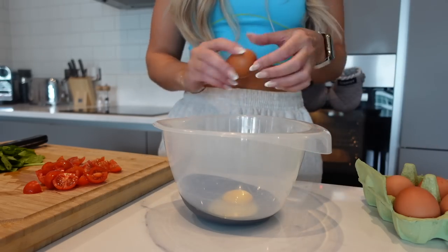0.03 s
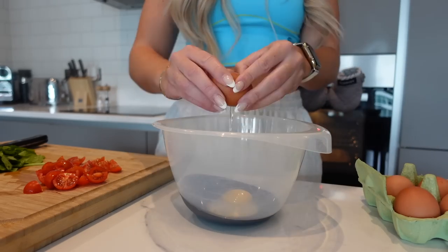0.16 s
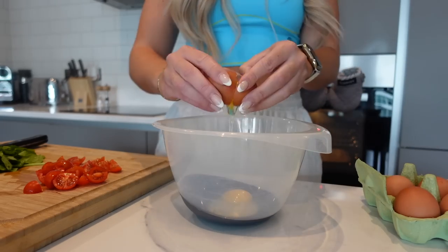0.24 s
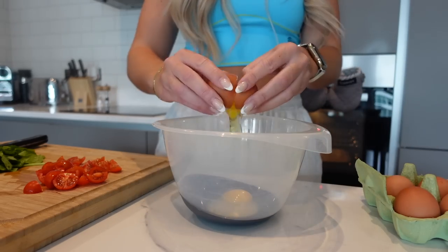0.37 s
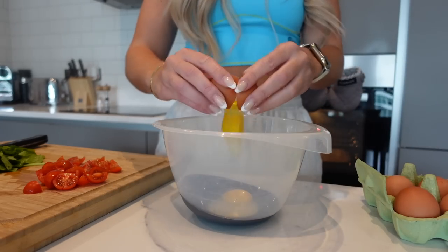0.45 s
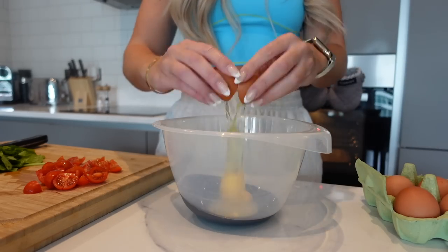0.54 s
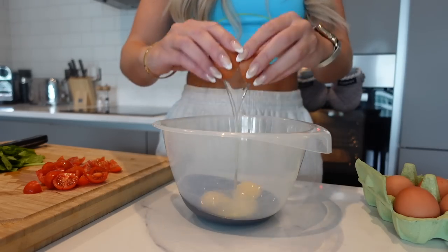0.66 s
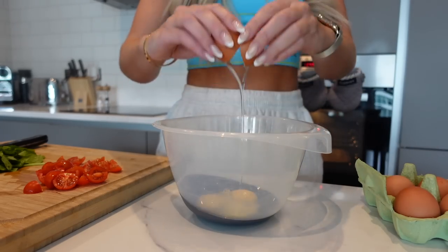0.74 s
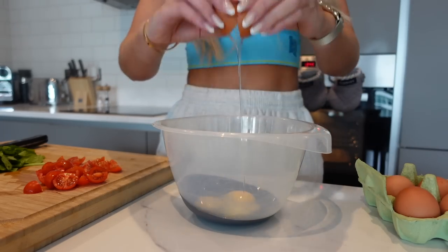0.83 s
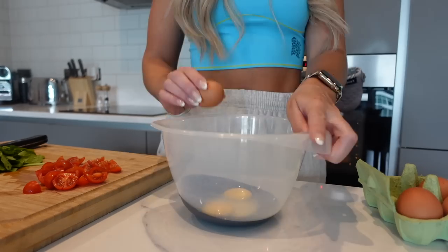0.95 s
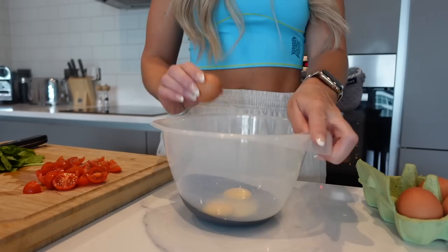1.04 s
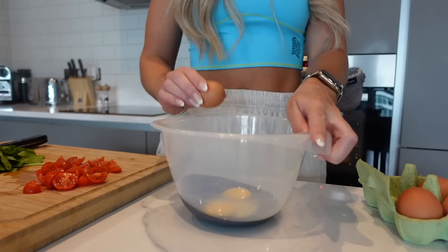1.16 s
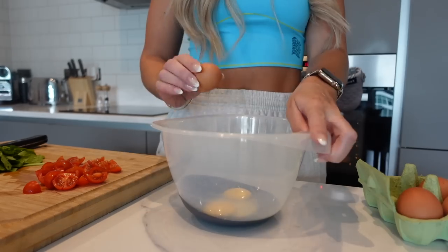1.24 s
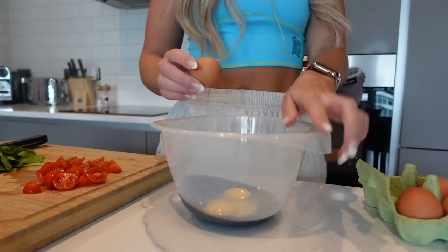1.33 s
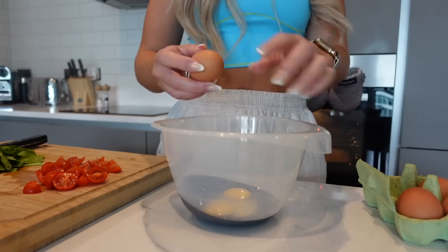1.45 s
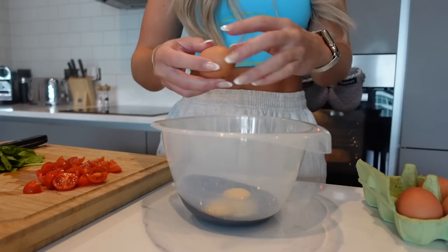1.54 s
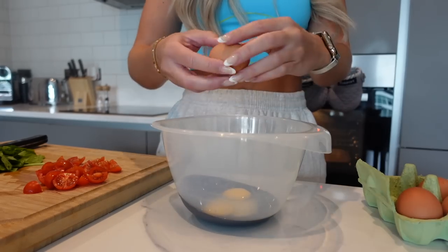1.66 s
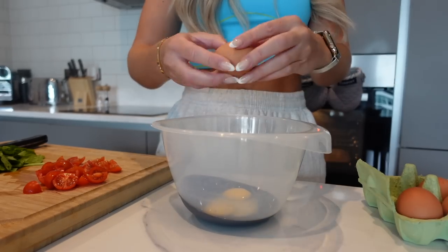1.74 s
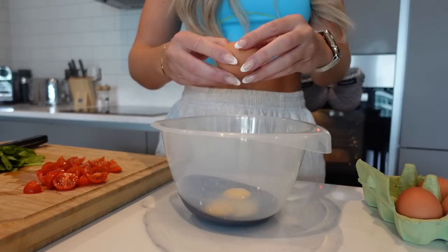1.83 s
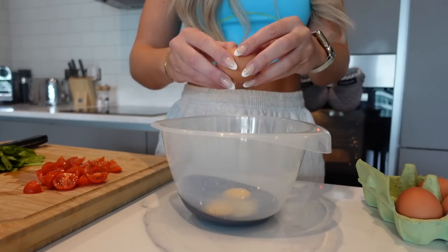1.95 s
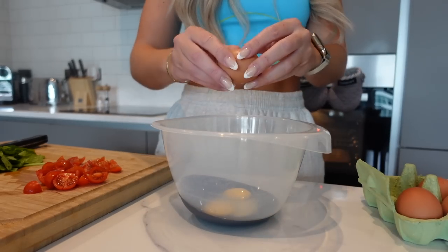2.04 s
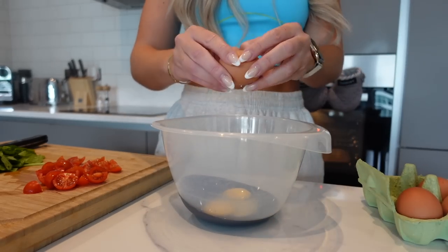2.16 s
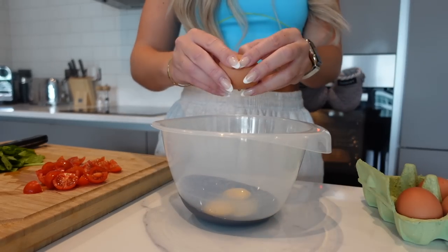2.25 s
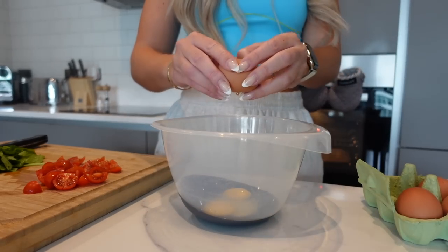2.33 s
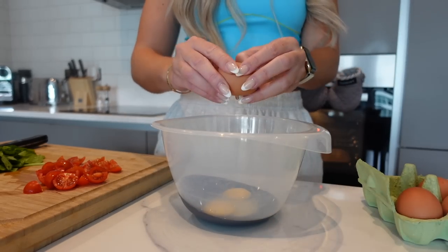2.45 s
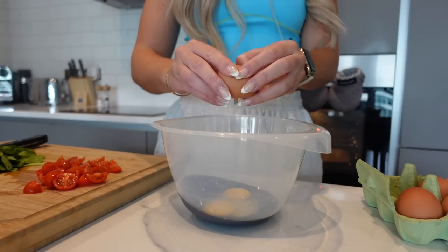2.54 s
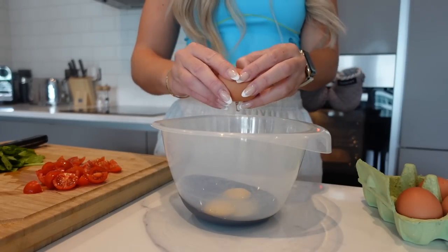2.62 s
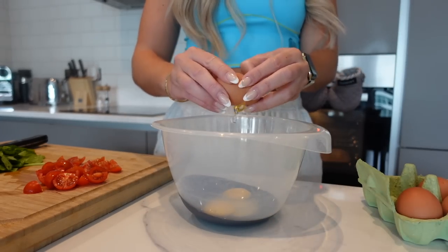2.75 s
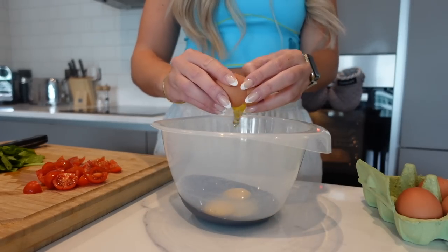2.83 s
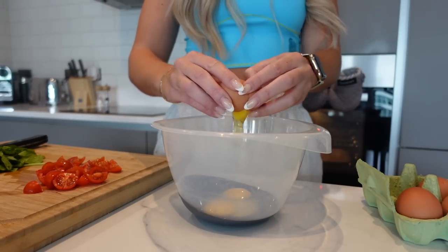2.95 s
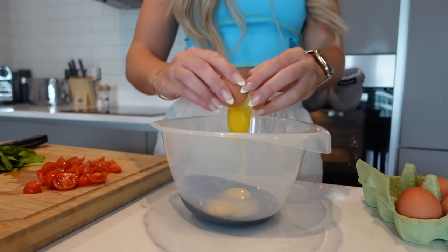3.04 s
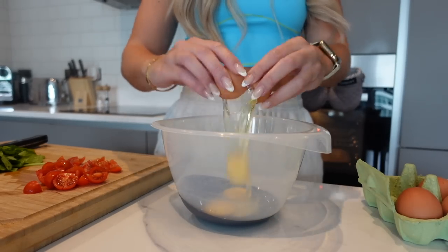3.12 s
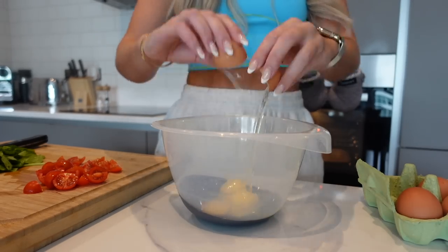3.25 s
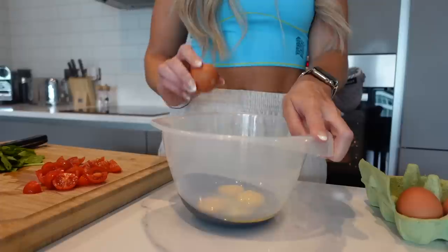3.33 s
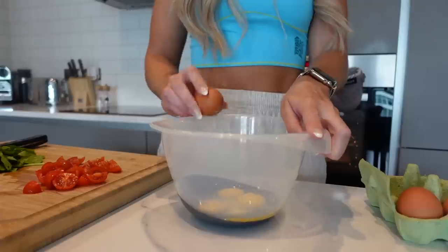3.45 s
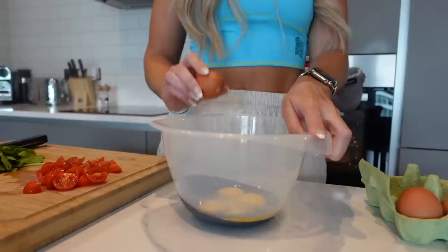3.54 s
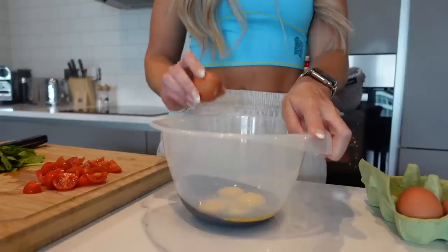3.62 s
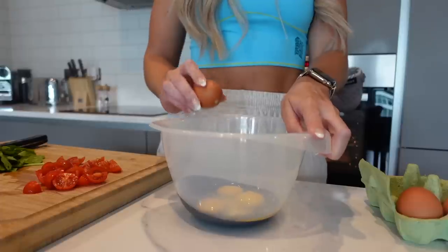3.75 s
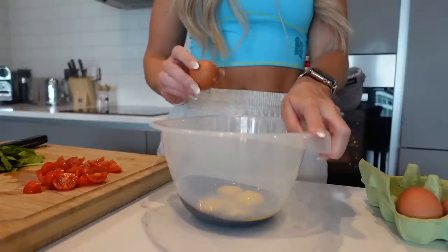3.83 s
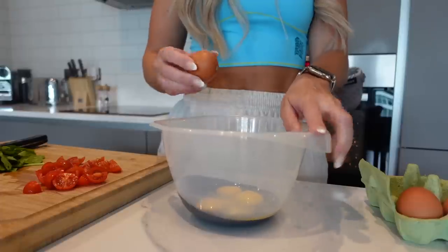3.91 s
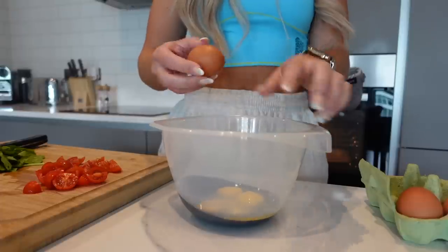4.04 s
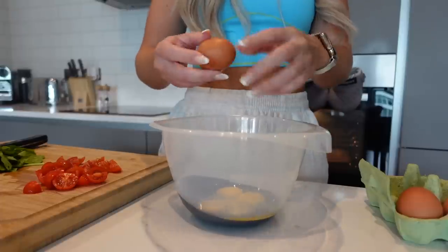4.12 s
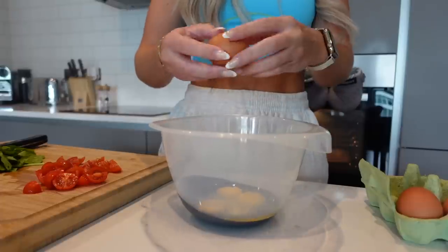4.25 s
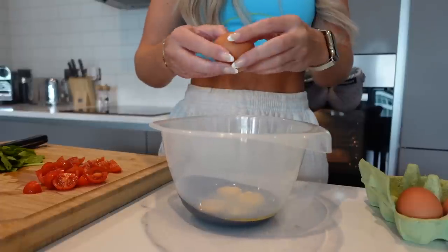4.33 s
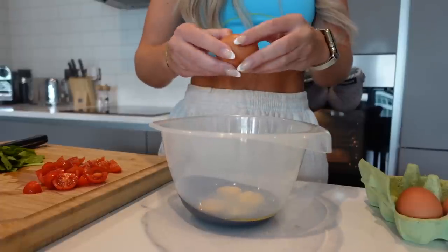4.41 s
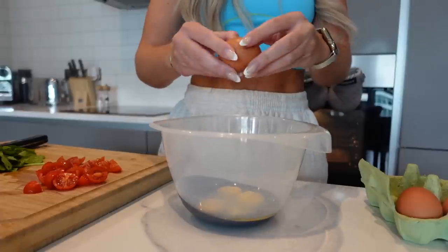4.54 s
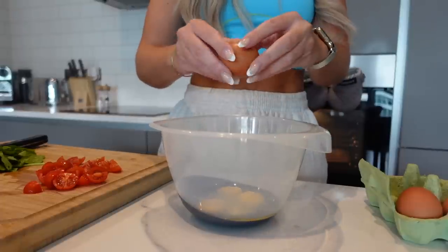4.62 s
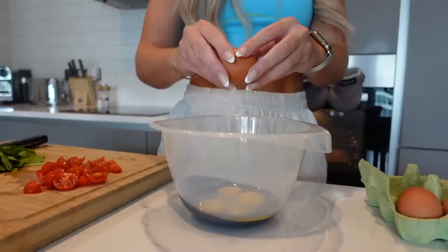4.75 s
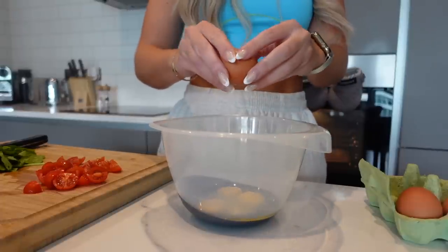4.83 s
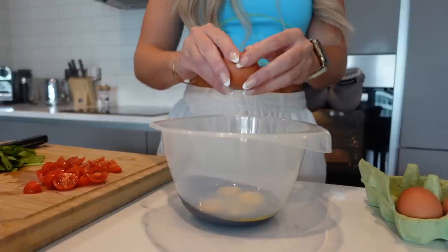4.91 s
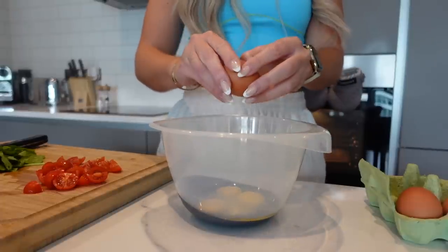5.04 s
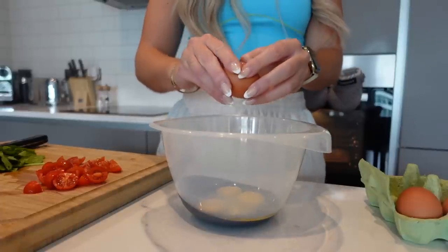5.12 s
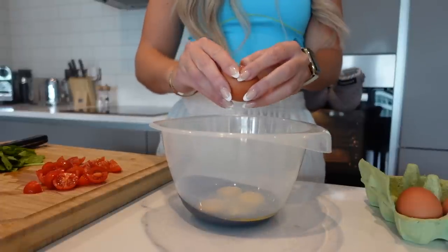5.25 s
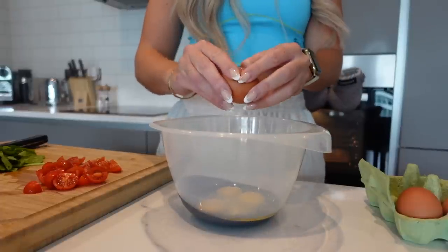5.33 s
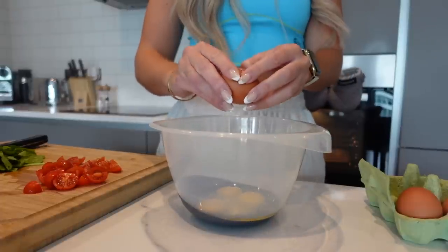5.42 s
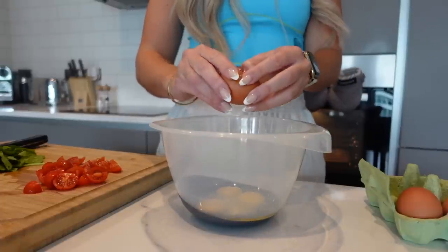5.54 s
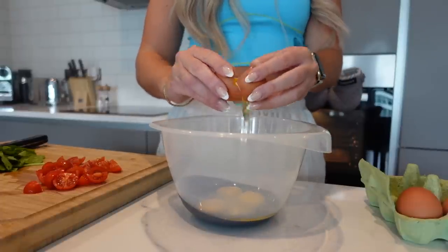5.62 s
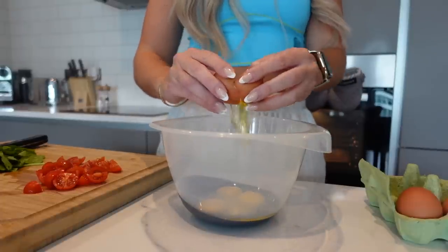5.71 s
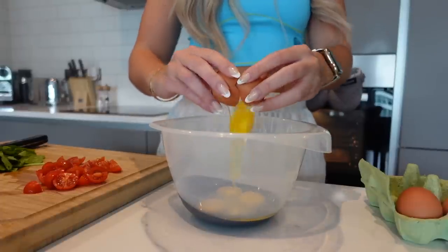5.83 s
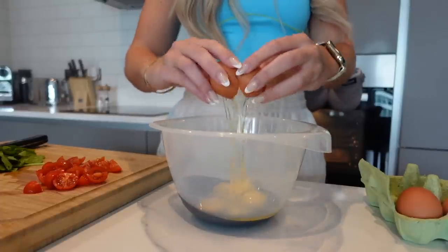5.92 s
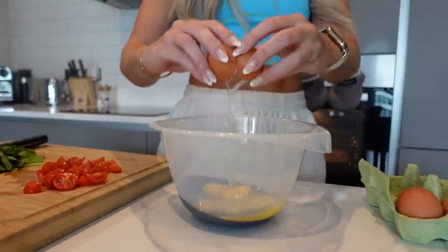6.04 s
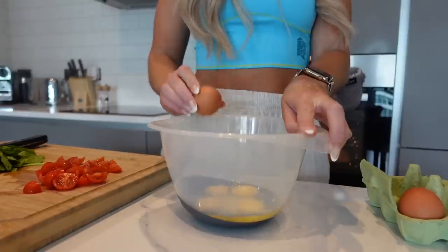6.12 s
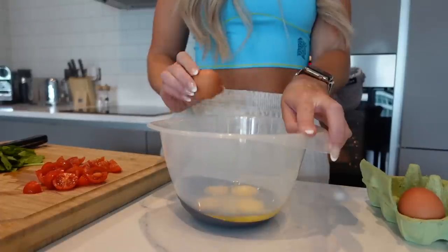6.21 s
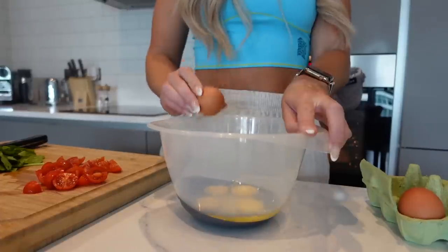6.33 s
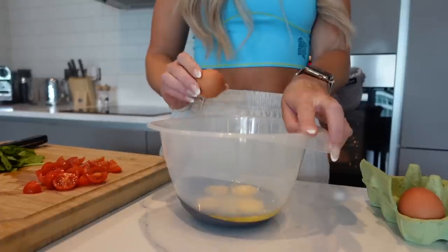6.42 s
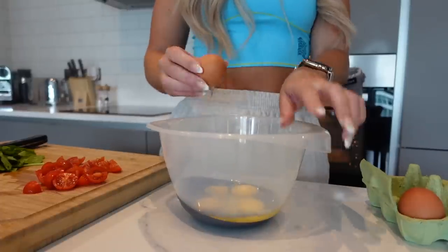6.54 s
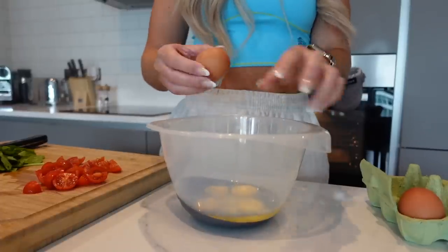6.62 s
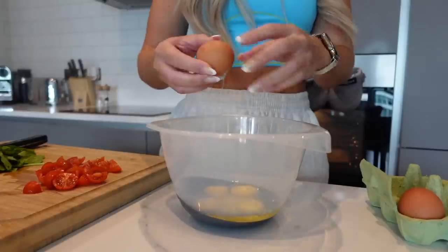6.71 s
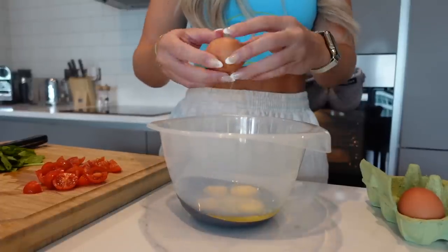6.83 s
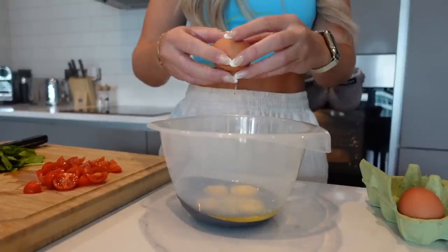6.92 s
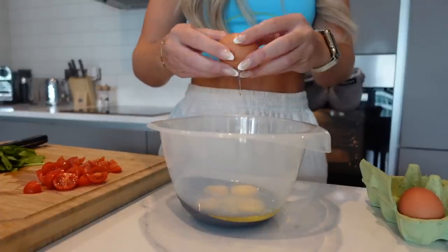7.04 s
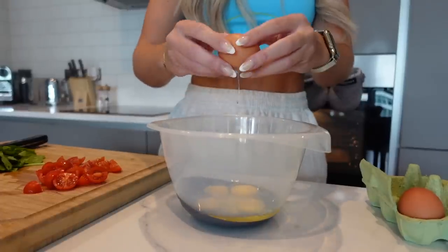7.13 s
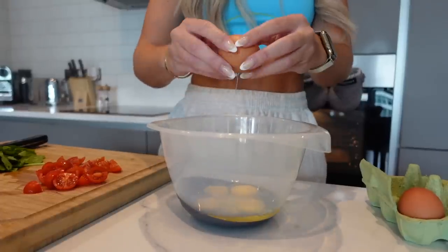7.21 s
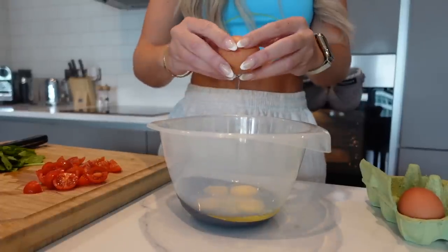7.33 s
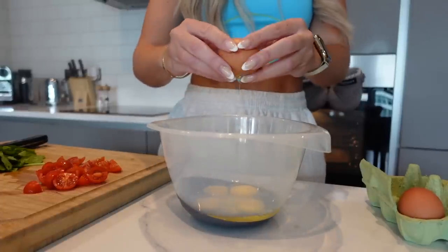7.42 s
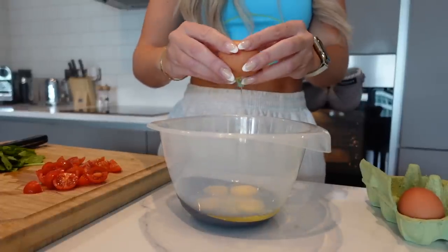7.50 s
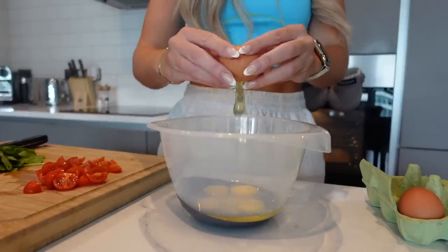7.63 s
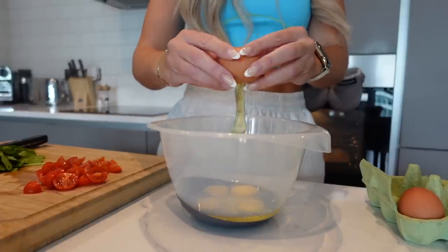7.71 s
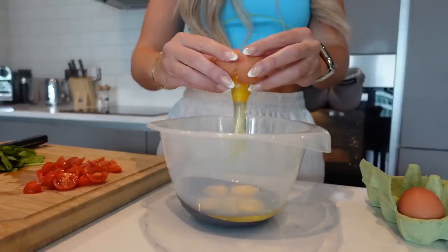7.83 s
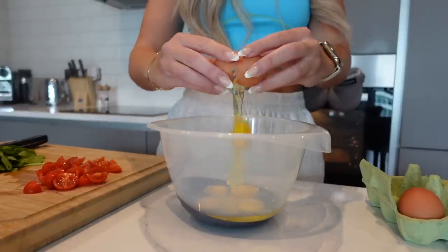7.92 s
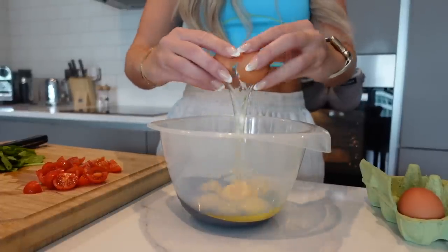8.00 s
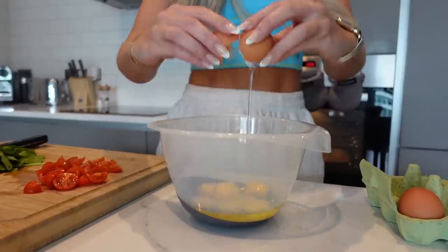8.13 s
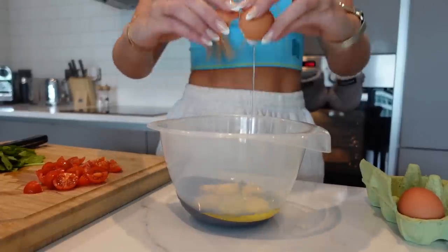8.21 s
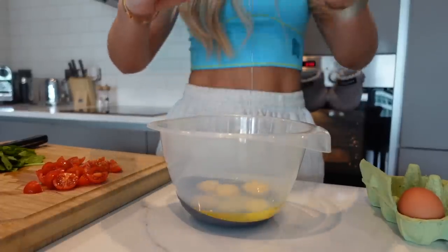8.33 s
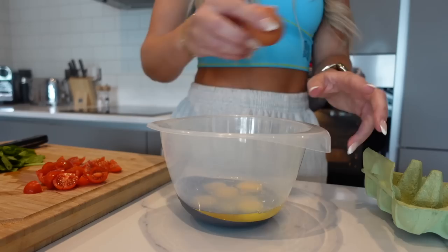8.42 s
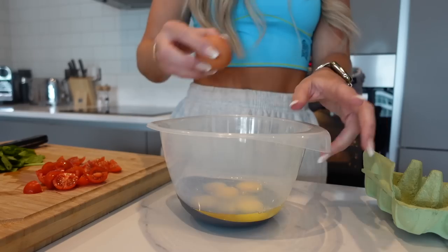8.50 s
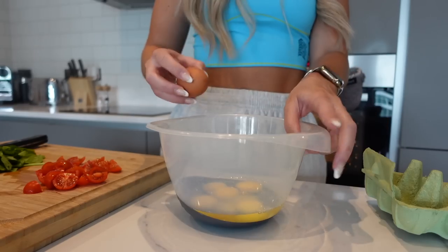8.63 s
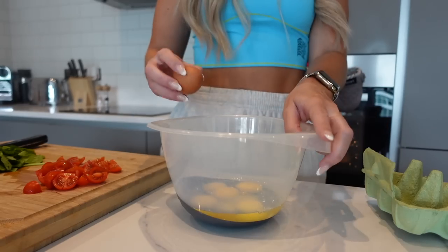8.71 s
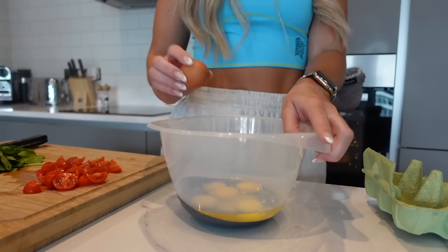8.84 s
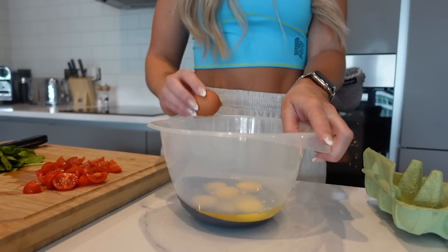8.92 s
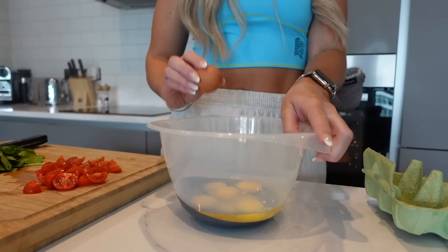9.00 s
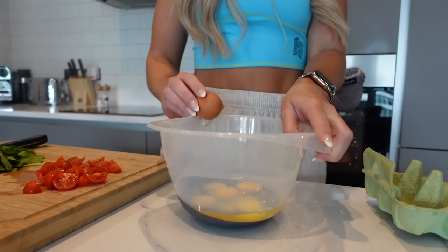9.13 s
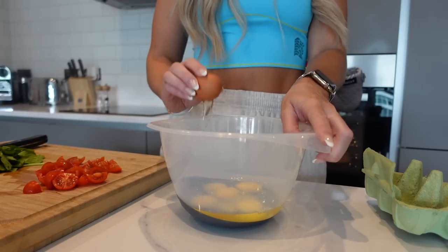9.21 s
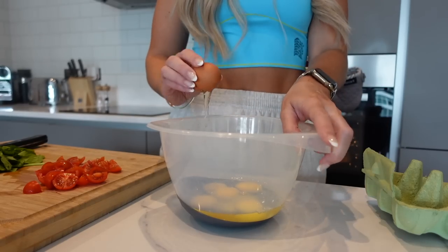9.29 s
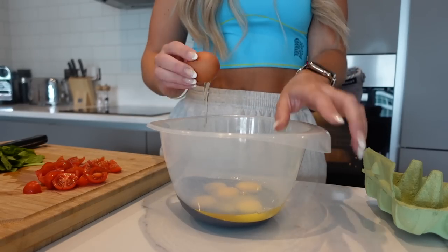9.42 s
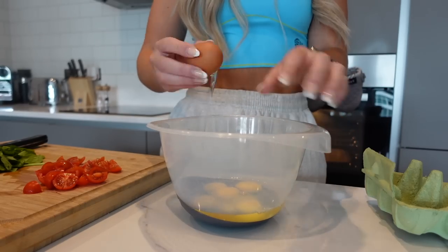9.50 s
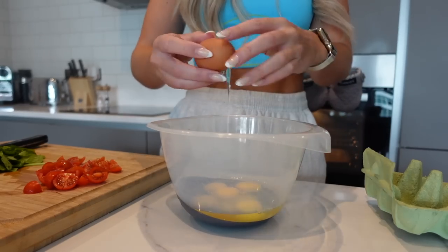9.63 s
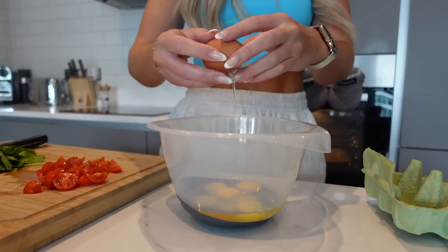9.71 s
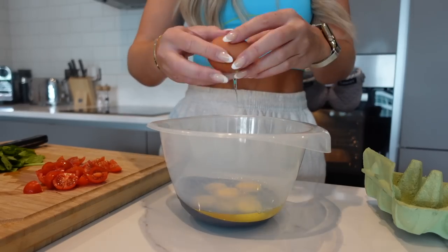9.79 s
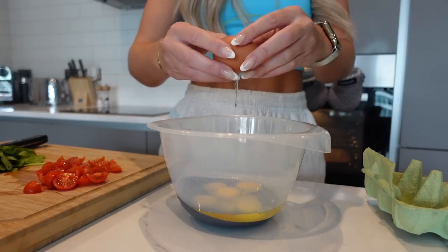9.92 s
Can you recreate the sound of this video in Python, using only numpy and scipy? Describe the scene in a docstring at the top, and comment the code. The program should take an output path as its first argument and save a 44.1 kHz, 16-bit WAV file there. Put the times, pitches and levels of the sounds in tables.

```python
"""Cracking eggs over a bowl

Eggs are knocked two or three times on a kitchen counter, then pulled open over a plastic bowl.
Knocks are noise bursts with a booming counter and hard-room echoes; shell snaps are cracks plus hollow rings.
Wet white makes small blips, nails tick, chips crumble and a hand slides, built from short rings and noise.
Underneath lie a low room noise and a distant rush, both made of coloured noise."""
import sys
import numpy as np
from scipy import signal
from scipy.fft import rfft, irfft, next_fast_len
from scipy.io import wavfile
from scipy.ndimage import uniform_filter1d

SR = 44100
rng = np.random.default_rng(int(sys.argv[2]) if len(sys.argv) > 2 else 0)


def file_out(sig):
    """Save sig as 16-bit WAV at sys.argv[1]."""
    # one column per channel
    cols = np.atleast_2d(sig).T
    # limit, then scale
    lim = np.clip(cols, -1, 1)
    pcm = np.round(lim * 32767).astype(np.int16)
    wavfile.write(sys.argv[1], SR, pcm)


N = 439236  # length of the scene in samples
TOP_HZ = 15900  # nothing is kept above this
T = np.arange(int(.6 * SR)) / SR  # clock of one short sound, in seconds


def amp(db):
    """Turn decibels into a multiplier."""
    return np.exp(np.asarray(db) * (np.log(10) / 20))


def unit(x):
    """Scale to rms 1, a standard average strength."""
    return x / np.sqrt(np.mean(x ** 2) + 1e-20)


def burst(x):
    """Scale a short sound to the energy of 5 ms at rms 1."""
    return x * np.sqrt(.005 * SR / np.sum(x ** 2))


def along(points, hz):
    """Read a curve of (f/Hz, value) points, with frequency on a log axis."""
    f, value = np.transpose(points)
    return np.interp(np.log(hz + 1), np.log(f + 1), value)


def hump(hz, centre, octaves):
    """A bell curve of height 1 on the log-frequency axis."""
    return np.exp(-.5 * np.minimum((np.log2((hz + 1) / centre) / octaves) ** 2, 20))


def filtered(x, gain):
    """Multiply each frequency of x by its own gain."""
    n = x.shape[-1]
    padded = next_fast_len(n + min(n, 4096), real=True)
    spectrum = rfft(x, padded) * gain(np.fft.rfftfreq(padded, 1 / SR))
    return irfft(spectrum, padded)[..., :n]


def noise(shape, colour_db):
    """Noise of rms 1 whose colour is a curve in dB over frequency."""
    return unit(filtered(rng.standard_normal(shape), lambda hz: amp(colour_db(hz))))


def wobble(rate):
    """A wandering random curve with `rate` new values a second, joined by straight lines."""
    knots = rng.standard_normal(int(N * rate / SR) + 2)
    return np.interp(np.arange(N) * rate / SR, np.arange(len(knots)), knots)


def spread(pair, side_db):
    """Use two unrelated signals as the middle and side of a stereo pair."""
    middle, side = pair
    return middle + amp(side_db) * np.array([side, -side])


def add(track, s, sound):
    """Mix a sound into the track at time s."""
    i = max(round(s * SR), 0)
    track[..., i:i + sound.shape[-1]] += sound[..., :N - i]


# how long the kitchen echoes: (f/Hz, time to fall 60 dB t/s)
ROOM = [(100, 0.63), (400, 0.66), (1500, 0.53), (5000, 0.6), (10000, 0.43), (16000, 0.38)]


def dying(x, delay):
    """After a delay each frequency fades at the kitchen's own speed."""
    hz, t, z = signal.stft(x, SR, nperseg=256)
    fade = amp(-60 * np.maximum(t - delay, 0) / along(ROOM, hz)[:, None])
    return signal.istft(z * fade, SR, nperseg=256)[1][..., :len(T)]


def kitchen(x, build_s=0.002, side_db=-18):
    """The room's stereo echo: every bit of the sound sets off a fading wash of noise."""
    tail = dying(spread(rng.standard_normal((2, len(T))), side_db), 0) * (1 - np.exp(-T / build_s))
    return signal.oaconvolve(x[None], tail / np.linalg.norm(tail[0]), axes=1)


def wash(parts, t60=0.45, side_db=-16, build_s=0.0016):
    """The room's short stereo hiss after a click made of (level/dB, spectrum) parts."""
    t = T[:12288]
    hz = np.fft.rfftfreq(len(t), 1 / SR)
    gain = np.sqrt(sum((amp(db) * unit(colour(hz))) ** 2 for db, colour in parts))
    hiss = irfft(rfft(rng.standard_normal((2, len(t)))) * gain)
    return spread(hiss, side_db) * burst(amp(-60 * t / t60) * np.minimum(t / build_s, 1))


# colour of the room noise: (f/Hz, relative level/dB)
HUSH = [(15, -89), (25, -34.5), (64, -35), (74, -11), (87, -2), (180, 0), (293, -1.5), (659, -16),
        (887, -7), (1700, -18.5), (2050, -20), (2550, -23.5), (4490, -27.5), (7310, -30), (16000, -38.5)]


def hush(level_db=-54.0, waver_db=1.7):
    """Low room noise: steady coloured noise whose level wavers slightly."""
    hiss = noise((2, N), lambda hz: along(HUSH, hz))
    return spread(hiss, side_db=-9.5) * amp(level_db + waver_db * wobble(9))


# path of the distant rush: (t/s, level/dB, centre f/Hz)
RUSH = [(0, -59, 1046), (1.6, -55, 1076), (2.5, -57.5, 990), (4.3, -57, 852), (5.2, -60, 966),
        (6.7, -53, 1000), (7.3, -53.5, 960), (8.2, -54.5, 825), (8.8, -56, 864), (9.9, -54, 982)]


def rush(band_db=7, band_octaves=0.37):
    """A distant rush: noise with a raised band that drifts in pitch and loudness."""
    s, db, centre = np.transpose(RUSH)
    hz, t, z = signal.stft(rng.standard_normal((2, N)), SR, nperseg=1024)
    skirt = [(200, -29), (550, 2.5), (1000, 0.5), (1500, 0.5), (2800, -11.5), (8000, -39)]
    skirt_db = along(skirt, hz)[:, None]
    moving = hump(hz[:, None], np.interp(t, s, centre), band_octaves)
    band = amp(skirt_db + band_db * moving)
    far = unit(signal.istft(z * band, SR, nperseg=1024)[1][:, :N])
    level_db = np.interp(np.arange(N) / SR, s, db) + 0.55 * wobble(3.2)
    return spread(far, side_db=-9.5) * amp(level_db)


# fingers work at the shell: (start t/s, end t/s, level/dB before colouring)
HANDLING = [(0.197, 0.437, -62.5), (1.608, 2.389, -63.5), (2.752, 2.949, -62), (3.002, 3.202, -65),
            (4.232, 4.718, -69), (4.856, 4.948, -66), (5.624, 6.141, -66), (6.801, 6.882, -64.5),
            (6.955, 7.021, -53.5), (7.201, 7.739, -59.5), (7.804, 8.396, -64.5), (9.73, 9.964, -63)]
# colour of the small chips: (f/Hz, gain as level/dB)
CHIPS = [(500, -30.5), (1500, 0.5), (4000, 1), (8000, 2.5), (11500, -5), (16000, -12.5)]


def crumbling(rate=70, size_db=5, chip_t60=0.0081, room_db=-1):
    """Tiny chips break at random under the fingers, each a very short noise burst."""
    out, t = np.zeros(N), T[:512]
    for start, end, db in HANDLING:
        length = end - start
        span = np.zeros(int(length * SR) + 2 * len(t))
        for place, size in rng.random((int(rate * length) + 2, 2)):
            chip = rng.standard_normal(len(t)) * amp(-60 * t / chip_t60)
            # many small chips, a few big ones
            add(span, place * length, chip * amp(-size_db * np.log(size + 0.058)))
        add(out, start, amp(db) * span * np.sqrt(length * SR / np.sum(span ** 2)))
    out = filtered(out, lambda hz: amp(along(CHIPS, hz)))
    return out + amp(room_db) * kitchen(out)[:, :N]


# basic colour of a shell crack: (f/Hz, relative level/dB)
CRACK = [(300, -30.5), (900, -15), (1500, 1), (3000, -1), (5000, -1.5), (8500, -2.5), (11500, -6),
         (16000, -18.5)]
WET_DB = 15  # ring over crack, in dB, that counts as fully wet
WET_MUFFLE_DB = 10  # top treble lost by a fully wet crack
DRY_HZ, LOW_MUFFLE_DB = 5500, 5  # cracks pitched below DRY_HZ lose this much top treble per octave


def fractures(rows, ring_t60=0.015, crack_t60=0.0234, attack_s=0.0013, upper_db=-17, rise=0.022,
              spiky_db=4, first_break=7, focus_db=7, focus_octaves=0.29, ring_octaves=0.093,
              ring_room_db=-2, small_dry=0.043, crack_room_db=-4.0):
    """Each fracture is a spiky crack that rings the air in the wet shell; rows as in SNAPS."""
    out, t = np.zeros((2, N)), T[:2048]
    hollow = [(1.003, 0.5), (0.832, -13), (1.225, -12.5), (1.5, upper_db)]  # (times the pitch, level/dB)
    for s, ring_db, hz, crack_db, crack_hz in rows:
        # the hollow rises a little in pitch as the gap opens
        cycles = np.cumsum(hz * (1 + rise * (1 - 2 * np.exp(-t / 0.004)))) / SR
        modes = sum(amp(db) * np.sin(2 * np.pi * (ratio * cycles + rng.random())) for ratio, db in hollow)
        ring = burst(modes * amp(-60 * t / ring_t60) * (1 - np.exp(-t / attack_s)))

        def ring_colour(f):
            return sum(amp(db) * hump(f, hz * ratio, ring_octaves) for ratio, db in hollow)

        # wet or low cracks are duller
        wetness = np.clip((ring_db - crack_db) / WET_DB, 0, 1)
        octaves_low = max(np.log2(DRY_HZ / crack_hz), 0)
        muffle = [(6000, 0.0074), (12000, -WET_MUFFLE_DB * wetness - LOW_MUFFLE_DB * octaves_low)]

        def crack_colour(f):
            focus = focus_db * hump(f, crack_hz, focus_octaves)
            return amp(along(CRACK, f) + along(muffle, f) + focus)

        spikes_db = spiky_db * rng.standard_normal(len(t))
        tearing = rng.standard_normal(len(t)) * amp(spikes_db - 60 * t / crack_t60)
        tearing[np.searchsorted(t, .0004)] += first_break  # one sharp click near the start
        crack = burst(filtered(tearing, crack_colour))
        add(out, s, amp(ring_db) * ring + amp(crack_db) * crack)
        # quiet rings get less room than loud ones
        echo_db = ring_room_db + small_dry * (ring_db + 35)
        add(out, s, wash([(ring_db + echo_db, ring_colour), (crack_db + crack_room_db, crack_colour)]))
    return out


# a shell being pulled open: (t/s, ring level/dB, hollow f/Hz, crack level/dB, crack f/Hz)
SNAPS = [(0.2234, -45.5, 2420, -53, 3000), (0.4948, -28, 1450, -51, 3200), (0.501, -22, 1555, -39.5, 3020),
         (0.509, -25.5, 1660, -46, 3000), (0.5248, -28.5, 1590, -44, 3000),
         (0.6504, -29.5, 1500, -43, 3650), (2.3175, -44.5, 1570, -40.5, 3200),
         (2.356, -44, 1600, -42.5, 3100), (2.4027, -41, 1690, -35, 4800), (2.416, -41, 1860, -39.5, 3080),
         (2.6308, -40.5, 1730, -71, 2970), (2.7515, -33.5, 1660, -45, 5000), (2.758, -33, 1700, -40, 5400),
         (2.7672, -29, 1790, -31.5, 8600), (2.785, -29.5, 1840, -35, 5650),
         (2.8195, -27, 1910, -30.5, 6300), (2.8415, -40, 2380, -32, 3830), (2.853, -30.5, 1460, -44, 3000),
         (2.861, -35, 1500, -41, 5700), (2.9752, -34.5, 1485, -66, 3000), (3.2088, -37, 2344, -26.5, 8000),
         (3.2518, -40, 3860, -34, 4400), (5.6004, -18.5, 2796, -31.5, 7000), (5.642, -39, 2640, -40, 5100),
         (5.763, -36.5, 1550, -38, 3000), (5.782, -27.5, 2230, -32, 3480), (5.7922, -23.5, 2010, -36, 4300),
         (5.909, -34, 1840, -48, 3000), (6.117, -36, 1850, -48.5, 3400), (7.4066, -41.5, 3340, -40.5, 5200),
         (7.565, -44, 1560, -48.5, 5200), (7.7642, -26, 1460, -21, 5650), (7.7662, -26.5, 3190, -29, 5300),
         (7.7852, -23.5, 3170, -27.5, 7500), (7.7861, -26.5, 1660, -39, 3600),
         (7.9424, -38.5, 1710, -35.5, 6100), (8.078, -37, 1890, -52, 3600), (8.098, -42, 1870, -45, 2980),
         (8.1722, -44, 2280, -41, 4000)]


def snaps():
    """The opening shell breaks in snaps, each ringing its hollow."""
    return fractures(SNAPS)


# wet white lets go: (start t/s, end t/s, typical blip level/dB, first f/Hz, last f/Hz)
SQUELCHES = [(0.26, 0.454, -54, 2550, 2000), (0.757, 0.881, -43, 1690, 1580),
             (2.868, 3.07, -47.5, 1500, 1520), (5.976, 6.099, -39.5, 1780, 1900),
             (7.272, 7.40, -51, 3930, 3370), (7.45, 7.482, -41, 2320, 2200),
             (7.688, 7.758, -39, 1490, 1267), (7.978, 8.028, -49, 1786, 1920)]


def squelches(gap_s=.028, scatter_db=2, scatter_octaves=0.075, crack_db=-13.5):
    """Wet white slips off the shell in scattered blips: mostly ring, with a weak crack."""
    rows = []
    for start, end, db, first_hz, last_hz in SQUELCHES:
        count = max(round((end - start) / gap_s), 1)
        for k, (when, size, pitch) in enumerate(rng.standard_normal((32, 3))[:count]):
            place = (k + .5 + np.tanh(when) / 2) / count
            hz = first_hz * (last_hz / first_hz) ** place * 2 ** (scatter_octaves * pitch)
            ring_db = db + scatter_db * size
            rows.append((start + place * (end - start), ring_db, hz, ring_db + crack_db, 2 * hz))
    return fractures(rows)


# nails and shell edges tick: (t/s, crack level/dB, crack f/Hz)
TICKS = [(0.2683, -47.5, 5600), (0.3376, -47, 5700), (0.616, -48, 3500), (1.4135, -45, 7840),
         (1.862, -48.5, 7200), (2.1912, -46, 6600), (2.227, -48, 7300), (2.3354, -47, 3300),
         (2.368, -47, 6100), (3.053, -52, 5400), (4.2379, -50.5, 10000), (4.2543, -48, 6100),
         (4.44, -44.5, 5840), (4.499, -51.5, 6100), (4.565, -50, 4700), (5.1715, -47.5, 5400),
         (5.178, -50, 4400), (5.615, -40, 7600), (5.9613, -44, 9000), (6.7244, -51, 3900),
         (7.005, -42.5, 7540), (7.2213, -48.5, 4470), (7.244, -47, 4200), (7.4377, -39, 6440),
         (7.5293, -45.5, 6480), (8.023, -42, 5780), (8.123, -46, 5000), (8.268, -51, 7300),
         (8.3607, -46.5, 6150), (9.813, -50.5, 4000), (9.873, -47.5, 3000)]


def ticks(ring_db=-10.5, hollow_hz=1444):
    """Nails and shell edges tick: mostly crack, barely ringing the egg."""
    return fractures([(s, db + ring_db, hollow_hz, db, hz) for s, db, hz in TICKS])


# counter tones: (f/Hz, level/dB, time to fall 60 dB t/s); level and pitch vary a little per blow
COUNTER = [(72.3, -20, .35), (110.8, -3.5, 0.43), (128.3, -5, 0.78), (144.4, -1, 0.49), (203.1, 1.5, 0.22),
           (231.2, -5.5, .22), (266, -8.5, 0.34), (293.4, -8.5, .37)]


def counter(attack_s=0.0075):
    """The counter booms in several low tones, struck at new strengths by every blow."""
    ring = 0
    for hz, db, t60 in COUNTER:
        strength = amp(db + rng.normal(0, 1.4) - 60 * T / t60)
        cycles = hz * rng.normal(1, 0.0061) * T + rng.random()
        ring = ring + strength * np.sin(2 * np.pi * cycles)
    return ring * (1 - np.exp(-T / attack_s))


# egg against the counter: (t/s, blow level/dB, crushing t/s, room level/dB reached at the end of its swell,
# room build-up t/s, hollow boost around 600 Hz as level/dB, counter boom level/dB)
KNOCKS = [(0.9457, -38, 0.0044, -19, 0.012, -4, -32.5), (1.1165, -12, 0.0043, -20.5, .035, -2, -30.5),
          (3.3229, -20.5, .006, -20.5, 0.021, 5.5, -30.5), (3.4770, -13, 0.0021, -22, 0.031, -2, -29),
          (3.71, -13.5, .0035, -25, 0.025, -6, -31.5), (6.159, -25.5, 0.0062, -21, 0.0071, 0.5, -24.5),
          (6.3162, -12, 0.0103, -20, 0.032, 0, -25), (8.9416, -15.5, 0.0022, -19.5, 0.058, -1.5, -28),
          (9.1299, -14, 0.0087, -21.5, 0.033, -6, -29.5)]
# basic colour of a knock: (f/Hz, relative level/dB)
KNOCK = [(10, -57), (30, -26), (90, -12), (220, -2), (390, -9.5), (620, 1.5), (880, -3.5), (1400, 3),
         (2100, 0), (2950, 1), (4000, -8), (7800, -13), (11000, -18.5), (16000, -28)]
# sharp resonances of a knock: (f/Hz, width f/Hz, boost as level/dB)
RESONANCES = [(610, 67, 4), (1160, 58, 2.5), (1380, 50, 2), (1690, 47, 8), (1880, 37, 4), (2206, 20, 8.5),
              (2734, 30, 5), (2830, 40, 1.5), (3560, 34, 0.5), (7970, 220, 3)]
BRIGHT_DB, DULLING = -2.4, 0.43  # treble of a knock; dB of it lost for each dB of hollowness


def knocks(swell_db=6, early_db=5, early_s=0.11, release_s=.011, ripple_db=1.0):
    """The shell caves in within a few ms; reflections build up, then die away."""
    out = np.zeros((2, N))
    ripple = ripple_db * rng.standard_normal(600)  # countless weaker resonances, the same for every knock
    for s, blow_db, crush, room_db, build, hollow_db, boom_db in KNOCKS:
        def colour(hz):
            peaks = sum(db / (1 + (2 * (hz - f) / width) ** 2) for f, width, db in RESONANCES)
            treble_db = BRIGHT_DB - DULLING * hollow_db
            tilt = along([(300, 0), (600, hollow_db), (1300, 0.0036), (3000, 0.0013), (6000, treble_db)], hz)
            fine = np.interp(hz, np.linspace(0, TOP_HZ, len(ripple)), ripple)
            return along(KNOCK, hz) + peaks + tilt + fine

        contact = np.minimum(T / 0.00098, 1) * amp(-60 * np.maximum(T - crush, 0) / release_s)
        blow = contact * noise(len(T), colour)
        blow /= np.std(blow[:int(crush * SR)])
        add(out, s, amp(blow_db) * blow)
        # the strong early reflections are spent sooner than the late tail
        growing = -swell_db * np.maximum(1 - T / build, 0)
        spent = -early_db * (1 - np.exp(-np.maximum(T - build, 0) / early_s))
        tail = dying(spread(noise((2, len(T)), colour), side_db=-13.5), build)
        add(out, s, tail * amp(room_db + growing + spent) * np.minimum(T / 0.0017, 1))
        add(out, s, amp(boom_db) * counter())
    return out


# dull bumps of egg and hand: (t/s, level/dB, f/Hz, time to fall 60 dB t/s)
BUMPS = [(1.131, -13, 473, 0.031), (3.331, -24, 236, 0.1), (3.498, -13.5, 628, 0.042),
         (3.515, -13, 593, 0.033), (3.531, -21, 244, 0.1), (4.080, -34.5, 128, 0.37),
         (6.161, -20, 52.2, 0.063), (6.346, -38, 223, 0.016), (8.024, -39, 155, 0.13),
         (9.155, -6, 1200, .011)]


def bumps(attack_cycles=0.57):
    """Soft contacts: a short ring with some noise around its pitch."""
    out = np.zeros(N)
    for s, db, hz, t60 in BUMPS:
        rough = noise(len(T), lambda f: -12 * np.log2((f + 1) / hz) ** 2)
        ring = np.sin(2 * np.pi * hz * T) + 0.44 * rough
        add(out, s, amp(db - 60 * T / t60) * (1 - np.exp(-T * hz / attack_cycles)) * ring)
    return out


def slide(start=3.92, end=4.20, level_db=-53.5, fade_s=.04, flutter_db=4.5):
    """A hand slides off the counter: skin brushes it with a dull, fluttering rustle."""
    out = np.zeros(N)
    stroke = np.clip(np.minimum(T, end - start - T) / fade_s, 0, 1)
    colour = [(30, -45), (80, -15), (200, 4), (400, -8), (650, 1),
              (1500, -11), (2900, -16.0), (4000, -26), (12000, -35)]  # (f/Hz, level/dB)
    rustle = noise(len(T), lambda hz: along(colour, hz))
    add(out, start, rustle * stroke * amp(level_db + flutter_db * wobble(90)[:len(T)]))
    return out


def widened(pair, width):
    """Change the left-right difference of a stereo pair by a gain for each frequency."""
    left, right = pair
    side = filtered((left - right) / 2, lambda hz: amp(along(width, hz)))
    return (left + right) / 2 + np.array([side, -side])


# stereo width of the egg sounds: (f/Hz, side gain as level/dB)
WIDTH = [(100, -4), (300, -0.5), (1500, -1), (4500, 1.5), (8000, 0.5), (13000, -19)]
# stereo width of crumbling and room noise: (f/Hz, side gain as level/dB)
FLOOR_WIDTH = [(100, -3.5), (300, 0.5), (1500, 0.5), (4500, 1.5), (8000, -8), (13000, -13)]


def scene():
    """Direct egg sounds sit straight ahead; echoes and room noise spread to the sides."""
    floor = hush() + rush() + crumbling()
    soft = bumps() + slide()
    soft_echo = amp(-12.5) * kitchen(soft)[:, :N]
    eggs = snaps() + squelches() + ticks() + knocks() + soft + soft_echo
    return widened(eggs, WIDTH) + widened(floor, FLOOR_WIDTH)


def record(dry, ceiling=0.65, low_cut_hz=45, left_db=-0.27):
    """Thin the deep bass, round off the tallest peaks and drop everything from TOP_HZ up."""
    high_pass = signal.butter(3, low_cut_hz, "high", fs=SR, output="sos")
    thin = signal.sosfilt(high_pass, dry) * amp([[left_db], [0]])  # left is a touch quieter
    rounded = thin / (1 + np.abs(thin / ceiling) ** 4) ** (1 / 4)
    return filtered(rounded, lambda hz: hz < TOP_HZ)


dry = scene()
out = record(dry)
file_out(out)
```